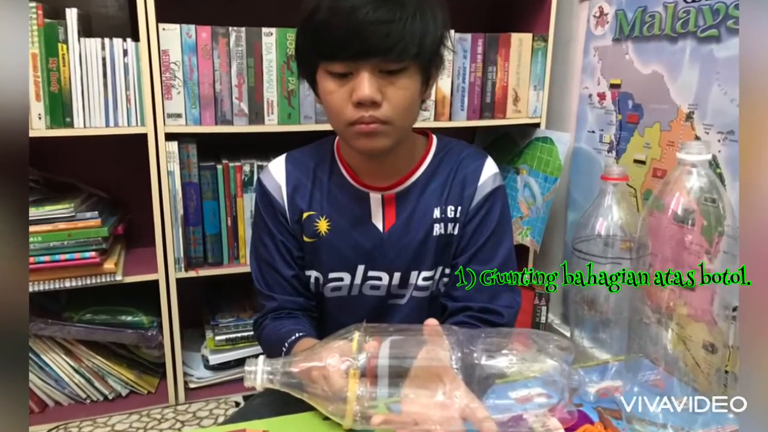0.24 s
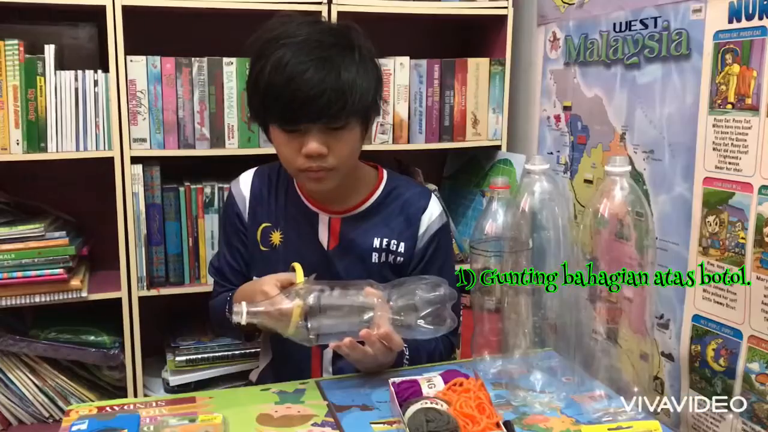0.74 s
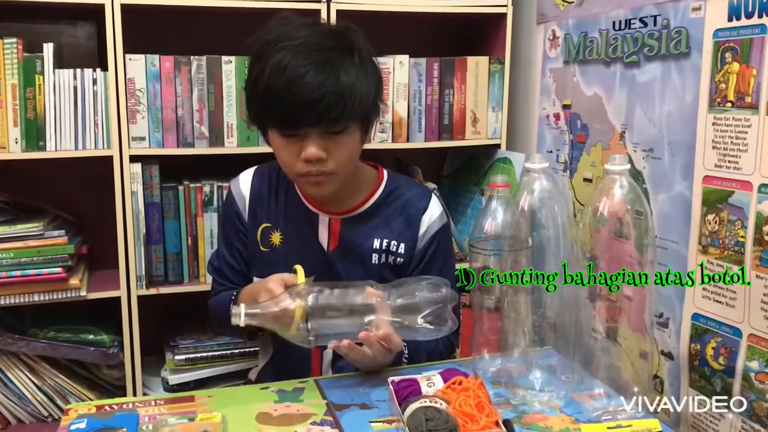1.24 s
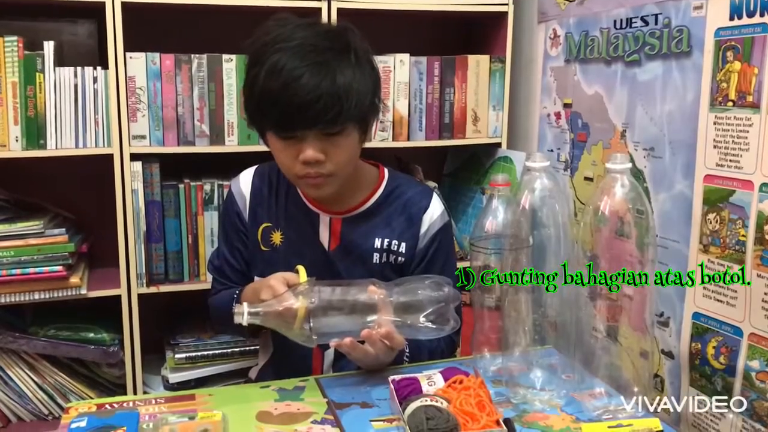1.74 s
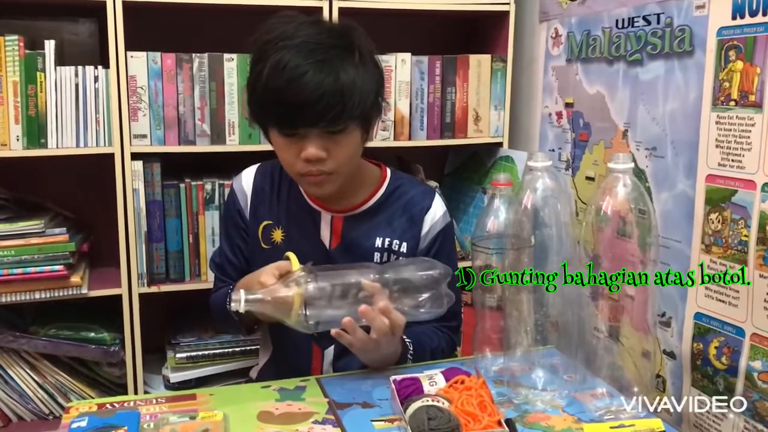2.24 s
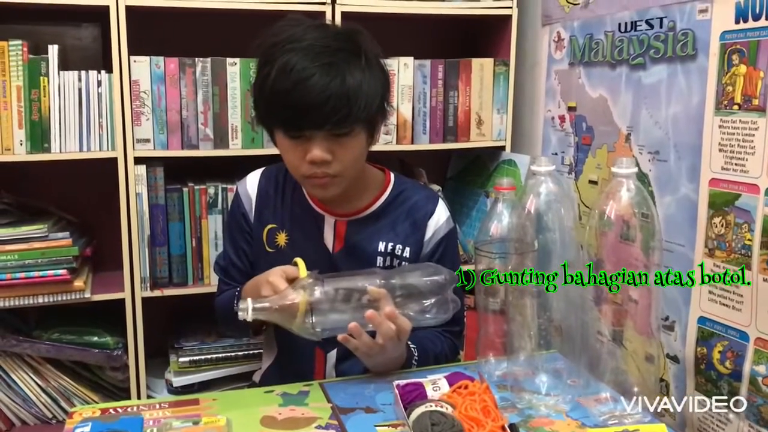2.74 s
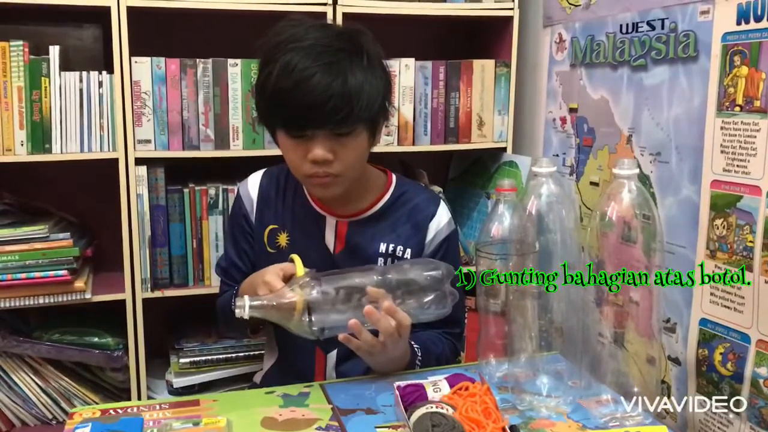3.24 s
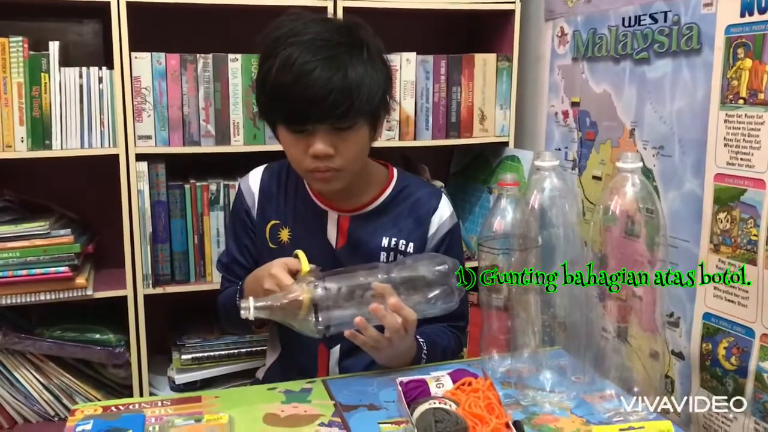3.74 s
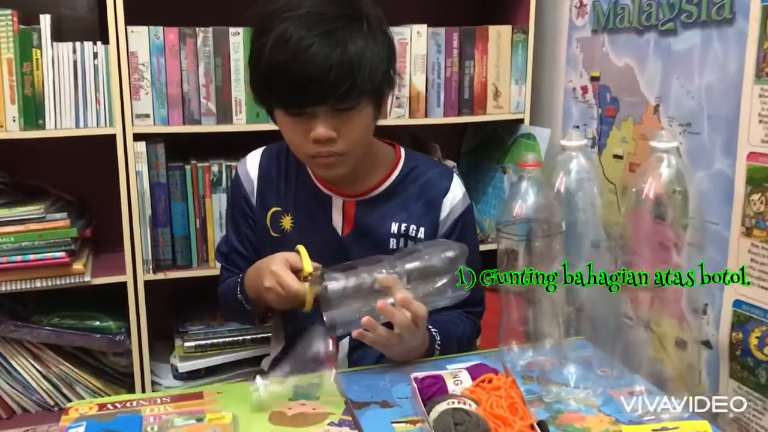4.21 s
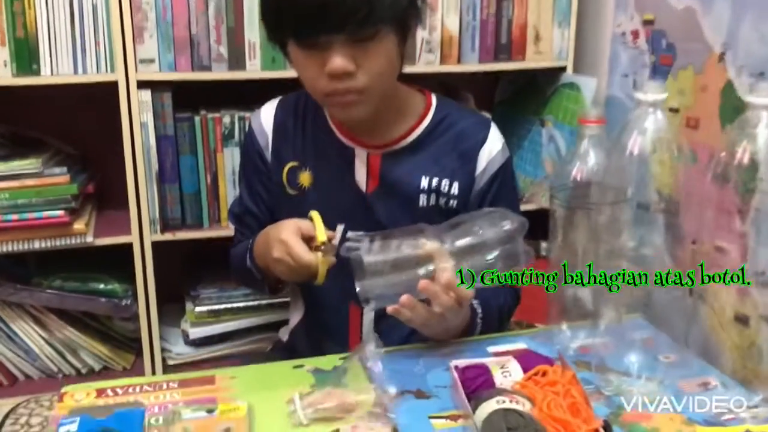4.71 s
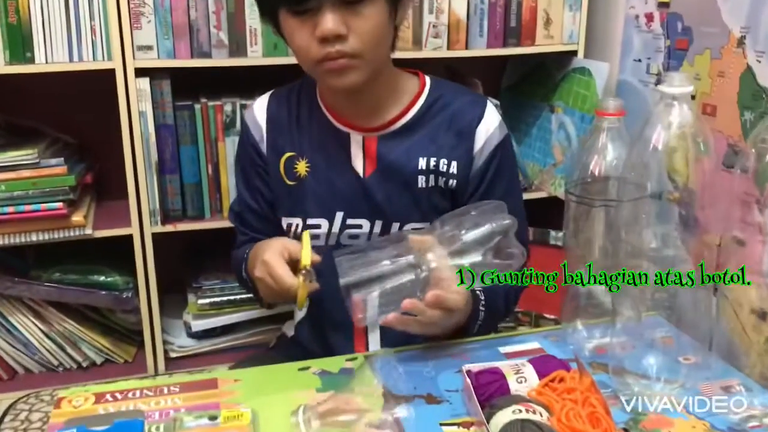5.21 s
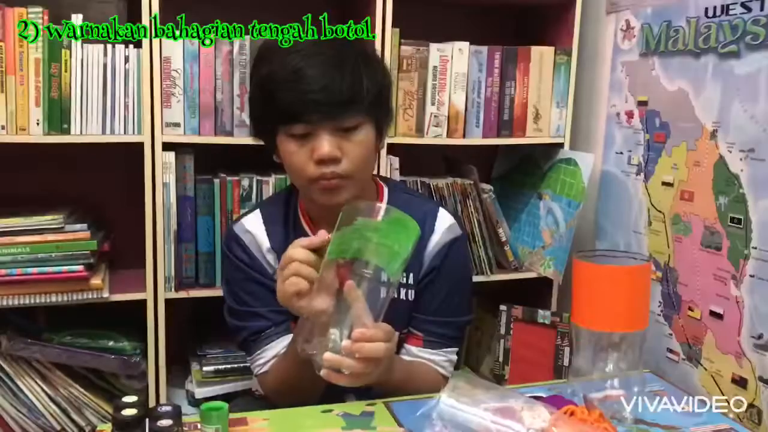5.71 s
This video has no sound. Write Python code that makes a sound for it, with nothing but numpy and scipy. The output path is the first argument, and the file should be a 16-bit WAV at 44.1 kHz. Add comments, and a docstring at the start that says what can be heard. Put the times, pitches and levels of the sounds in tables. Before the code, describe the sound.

The first 0.6 seconds are completely silent; then soft room air enters abruptly with a low hiss that fades over about a second. From 0.9 s, a thin plastic bottle crackles lightly as scissors bite in. A hollow snap comes at 1.4 s, with two more around 1.6 s, and bright crisp buckles follow near 1.8 to 1.95 s. From 2.1 to 3.7 s the cutting is quieter: short dry rasps, tiny ticks and a very faint high squeak around 2.8 s. Rasping and crackling thicken from 3.7 s, reaching a sharp, bright snap at 4.1 s. At 4.2 s the severed neck strikes the table with a loud hard plastic knock, then bounces at about 4.33, 4.4 and 4.5 s, dwindling by 4.7 s. The small room adds short reflections. Quiet air follows with barely audible ticks near 5.0 and 5.55 s; at 5.6 s a faint low mains hum and hiss switch in.

```python
"""Scissors cut the neck off a thin plastic bottle in a small furnished room. The blades rasp through the wall
in tiny slips, which ring the bottle; squeaks and thin ticks join in. The wall crackles and snaps in short
bursts of noise shaped by its modes and the air inside. After the last snap the neck drops and bounces on the
table, each knock ringing its own modes. The background is still room air filtered from noise; a hiss sets in at
the start and fades; a faint mains hum and hiss come in late."""
import sys
import numpy as np
from scipy import signal
from scipy.fft import rfft, irfft
from scipy.io import wavfile
from scipy.ndimage import uniform_filter1d

SR = 44100
rng = np.random.default_rng(int(sys.argv[2]) if len(sys.argv) > 2 else 0)


def wrap_up_sound(samples):
    """Save the sound to the file named by the first command line argument, as 16-bit audio."""
    columns = np.atleast_2d(samples).T
    # keep every value between -1 and 1, then stretch to whole-number steps
    tamed = np.clip(columns, -1, 1)
    steps = np.round(tamed * 32767).astype(np.int16)
    wavfile.write(sys.argv[1], SR, steps)


N = 262824
TIME = np.arange(N) / SR
START_S = 0.628  # silence before this

# the blades close, timed from the bite: start_s, length_s, bite_level_db,
# swell_db (until they stop), treble_db (relative to the rasp of the wall)
STROKES = [(1.073, 0.061, -59, 1.5, -13), (1.586, 0.03, -54, 13.5, -6.5), (2.168, 0.088, -58, 11, -12),
           (2.467, 0.043, -66.5, -7, -20), (2.764, 0.053, -59.5, 0, -11.5), (2.853, 0.0519, -60, 0, -8),
           (3.135, 0.17, -64, 12, -12.5), (3.59, .065, -58.5, -1.5, -9), (3.742, .1, -65, 4, -8.5),
           (3.927, 0.083, -54, -5, -10), (4.036, 0.074, -51.5, 14.5, -10)]
# low, mid, high and top ranges: low_edge_hz, high_edge_hz
RANGES = [(150, 600), (600, 2200), (2200, 7000), (7000, 17000)]


def from_db(db):
    """Decibels to amplitude gain."""
    return 10 ** (np.asarray(db) / 20)


def rms_one(x):
    """Scale to rms 1."""
    return x / np.sqrt(np.mean(x ** 2) + 1e-20)


def at_hz(points, hz):
    """Read a table of frequency and value on a log-frequency axis."""
    table_hz, value = np.transpose(points)
    return np.interp(np.log(np.maximum(hz, 1)), np.log(table_hz), value)


def band(x, low_hz, high_hz, order=2):
    """Causal band-pass."""
    sos = signal.butter(order, [low_hz, high_hz], "band", fs=SR, output="sos")
    return signal.sosfilt(sos, x + 1e-18)


def dying(t, t60):
    """Exponential envelope that falls 60 dB in t60 seconds."""
    return np.exp(-np.log(1000) * t / t60)


def coloured(x, spectrum):
    """Filter a running sound by a broad spectrum and bring it to rms 1."""
    gain = from_db(at_hz(spectrum, np.fft.rfftfreq(len(x), 1 / SR)))
    return rms_one(irfft(rfft(x) * gain, len(x)))


def resonate(x, modes):
    """A body passes the force, rings on at its modes and is weak at those with negative dB."""
    for hz, width_hz, db in modes:
        radius = np.exp(-np.pi * max(width_hz, 14) / SR)
        zeros = (1 - radius * radius) / 2 * np.array([1, 0, -1])  # unit gain at the mode
        poles = [1, -2 * radius * np.cos(2 * np.pi * hz / SR), radius * radius]
        ring = signal.lfilter(zeros, poles, x)
        x = x + (from_db(db) - 1) * ring
    return x


def add(out, x, s):
    """Mix x in at time s."""
    i = int(s * SR)
    out[i:i + len(x)] += x[:N - i]


def shifted(modes, detune, vary_db=3.5):
    """Grip and contact point change from touch to touch, and with them each mode's pitch and strength."""
    chance = rng.standard_normal((len(modes), 2))
    return [(hz * (1 + detune * a), width_hz, db + vary_db * b)
            for (hz, width_hz, db), (a, b) in zip(modes, chance)]


def bottle(s, cavity_width_hz=32, cavity_db=16):
    """Modes of the bottle at time s: the air inside and the wall around it, with a low standing wave of the
    room."""
    # resonance of the air, whose pitch changes as the cut opens: time_s, pitch_hz
    cavity = [(1.0, 364), (1.43, 334), (1.62, 347), (2.25, 361), (4.0, 359.5), (4.1, 396.5)]
    # wall, with a standing wave of the room near 90 Hz, before the variation of each touch: pitch_hz, width_hz,
    # level_db (over the broad response)
    wall_modes = [(90, 24, 11), (450, 300, 5.5), (560, 69, 4), (730, 130, -4.5), (894, 64, 7),
                  (1503, 15, 8), (1770, 24, -0.5), (2950, 1200, 4), (5370, 110, 0), (6800, 150, 3)]
    cavity_hz = np.interp(s, *np.transpose(cavity))
    return [(cavity_hz, cavity_width_hz, cavity_db)] + shifted(wall_modes, detune=.018)


def slips(t, per_s, spread_db, friction):
    """Random tiny jerks of uneven size and either sign, rms 1, over smooth friction noise."""
    sizes = from_db(spread_db * np.minimum(rng.exponential(1, len(t)), 4))
    signed = sizes * rng.choice([-1, 1], len(t))
    jerks = rms_one(signed * (rng.random(len(t)) < per_s / SR))
    return jerks + friction * rng.standard_normal(len(t))


def flattened(x, envelope):
    """Spread a crack in time under an envelope while its spectrum stays nearly even."""
    for _ in range(3):
        spectrum = rfft(x * envelope, 2 * len(x))
        x = irfft(spectrum / (np.abs(spectrum) + 1e-12))[:len(x)]
        x = x / np.sqrt(np.abs(uniform_filter1d(x ** 2, size=128)) + 1e-18)
    return x * envelope


def range_levels(balance, db, thump_db, bright_db):
    """Levels of a blow in the four ranges: a thump adds bass, a sharper contact adds treble."""
    *ranges_db, high_share = balance
    return db + np.array(ranges_db) + np.array([thump_db, 0, high_share * bright_db, bright_db])


def blows(events, balance, ring_t60s, after_db, after_t60):
    """Each blow rings its modes for a moment; smaller ticks follow as the struck part springs back."""
    out, t = np.zeros(N), TIME[:8192]
    level_samples = int(.008 * SR)  # a blow's energy is spread over 8 ms to define its level
    for s, db, thump_db, bright_db, modes in events:
        ticks = from_db(after_db) * slips(t, per_s=350, spread_db=2.0, friction=0) * dying(t, after_t60)
        levels_db = range_levels(balance, db, thump_db, bright_db)
        for (low_hz, high_hz), level_db, t60 in zip(RANGES, levels_db, ring_t60s):
            burst = flattened(rng.standard_normal(len(t)), dying(t, t60)) + ticks
            sound = band(resonate(burst, modes), low_hz, high_hz, order=3)
            level = np.sqrt(np.sum(sound ** 2) / level_samples)
            add(out, sound * from_db(level_db) / level, s)
    return out


def background():
    """Still room air, an opening hiss that fades away, and later a mains hum with more hiss."""
    # steady room air: frequency_hz, density_db (per Hz, relative)
    air_spectrum = [(18, -32.5), (30, -11), (53, 4), (179, -7.5), (266, -6), (486, -14), (702, -16),
                    (1860, -21), (3140, -21), (3580, -24), (10200, -29), (14800, -25.5), (16000, -28)]
    # opening and late hiss: frequency_hz, density_db (per Hz, relative)
    hiss_spectrum = [(76, -31.5), (130, -4), (258, -0.5), (356, -3), (394, -8), (577, -8), (1430, -9.5),
                     (8570, -30), (14500, -41), (16000, -29)]
    # mains hum: frequency_hz, level_db (rms)
    hum_tones = [(100, -62), (200, -73)]
    air_db, late_hiss_db, opening_hiss_db = -65.5, -61.5, -61
    opening_hiss_attack_s, opening_hiss_t60 = 0.011, 0.81
    hum_start_s, hum_fade_s = 5.59, 0.0031

    air = from_db(air_db) * coloured(rng.standard_normal(N), air_spectrum)
    hiss = coloured(rng.standard_normal(N), hiss_spectrum)
    age = np.maximum(TIME - START_S, 0)
    opening_envelope = np.minimum(age / opening_hiss_attack_s, 1) * dying(age, opening_hiss_t60)
    opening_hiss = from_db(opening_hiss_db) * opening_envelope * hiss
    hum = np.zeros(N)
    for hz, db in hum_tones:
        hum += np.sqrt(2) * from_db(db) * np.sin(2 * np.pi * (hz * TIME + rng.random()))
    late = np.clip((TIME - hum_start_s) / hum_fade_s, 0, 1)
    return air + opening_hiss + late * (hum + from_db(late_hiss_db) * hiss)


def panel(s, pitch_hz, width_hz, main_db):
    """Modes of the bottle at time s and of the panel that gives way."""
    # overtones of the panel, before variation: pitch_hz, width_hz, level_db (over the broad response)
    overtones = [(2020, 320, -3.5), (2990, 260, 4.5), (4160, 160, 5), (5600, 510, 3), (7200, 2500, -8.5),
                 (9190, 960, 4)]
    return bottle(s) + [(pitch_hz, width_hz, main_db)] + shifted(overtones, detune=.03)


def small_buckles():
    """While the blades close, the wall crackles at random, at a level that follows their pressure."""
    crackles_per_s = 24  # the count in each stroke is rounded down
    crackle_db, spread_db = -1.5, 1  # relative to the rasp, and up or down at random
    thump_db, bright_db, panel_hz = 3, 5.5, 940
    rows = []
    for start, length, db, swell_db, _ in STROKES:
        count = int(crackles_per_s * length)
        for k, (when, size) in enumerate(rng.uniform(0, 1, (count, 2))):
            done = (k + when) / count  # share of the stroke completed
            level_db = db + done * swell_db + crackle_db + spread_db * (2 * size - 1)
            rows.append((start + done * length, level_db, thump_db, bright_db, panel_hz))
    return rows


def crackles():
    """Panels of the wall buckle under the fingers and blades and ring briefly."""
    # single buckles: start_s, level_db (before balance), thump_db (extra bass), brightness_db, pitch_hz
    buckles = [(0.8756, -52.5, 4.5, 0.5, 929), (0.926, -55, 2, 1, 926), (0.9774, -53, 0, -4, 907),
               (1.015, -48.5, -0.5, -8.5, 910), (1.089, -52, 5, -6, 903), (1.243, -55, -9, -2, 1500),
               (1.255, -46, 3, 2, 1497), (1.8225, -45, -2, 4.5, 2920), (1.8988, -35, -14.5, 5, 921),
               (1.9534, -38.5, -6.5, 2, 953), (2.822, -59, -1.5, 7, 2100), (2.968, -51.5, 6.5, -4, 947),
               (3.431, -57.5, -22, 5, 1490), (3.586, -49.5, -5, 0, 960), (3.799, -51.5, -0.5, 2, 960),
               (3.828, -49.5, -6.5, 1, 1010), (4.029, -45, -2.5, -5, 925)]
    # offsets of the ranges: low_db, mid_db, high_db, top_db, share of brightness in the high range
    balance = (-4, 0.5, -6, -19.5, 0.94)
    events = []
    for s, db, thump_db, bright_db, hz in buckles + small_buckles():
        events.append((s, db, thump_db, bright_db, panel(s, hz, width_hz=50, main_db=9.5)))
    sound = blows(events, balance, ring_t60s=[0.029, 0.024, 0.034, 0.017], after_db=-12.5, after_t60=0.15)
    # a buckle is softer than steel and lacks the highest treble
    return signal.sosfilt(signal.butter(2, 10000, fs=SR, output="sos"), sound)


def pressing(t, length, db, swell_db, bite_s):
    """Envelope of a stroke, t counted from the bite: sink in, swell while the hand closes, release."""
    attack = np.clip(1 + t / bite_s, 0, 1) ** 2
    swell = from_db(db + swell_db * np.clip(t / length, 0, 1))
    release = dying(np.maximum(t - length, 0), t60=0.11)
    return attack * swell * release


def rasp(cavity_db, jerk_db):
    """In each stroke the blades slip through the wall in tiny steps, which ring the bottle."""
    # broad colour of the slipping force: frequency_hz, density_db (per Hz, relative)
    force_spectrum = [(70, -21), (200, -6), (400, -4), (700, 0.5), (1500, -5.5), (2200, -6), (3300, -7),
                      (4500, -12), (7000, -19), (16000, -24.5)]
    bite_s = .025  # the edge sinks in
    out, t = np.zeros(N), TIME[:SR // 2]
    for start, length, db, swell_db, treble_db in STROKES:
        effort = pressing(t - bite_s, length, db, swell_db, bite_s)
        # the blades catch and let go, so the force comes in clumps
        unevenness = rms_one(uniform_filter1d(rng.standard_normal(len(t)), size=350))
        catching = from_db(jerk_db * unevenness)
        steps = slips(t, per_s=1100, spread_db=2.5, friction=0.85)
        force = coloured(catching * steps, force_spectrum)
        ringing = resonate(force, bottle(start))
        wall = rms_one(band(ringing, RANGES[1][0], RANGES[2][1]))
        cavity = from_db(cavity_db) * rms_one(band(ringing, *RANGES[0]))
        edge = from_db(treble_db) * rms_one(band(force, *RANGES[3], order=4))
        add(out, effort * (wall + cavity + edge), start - bite_s)
    return out


def thin_ticks():
    """Thin bright ticks, most during the cutting and two after it, that ring bottle and blades."""
    # ticks: start_s, level_db (before balance)
    tick_rows = [(1.1243, -58.5), (1.757, -62), (2.999, -59), (3.7323, -53.5), (3.913, -52.5), (3.929, -47),
                 (4.086, -43.5), (4.974, -63.5), (5.558, -64.5)]
    # faint ring of the blades: pitch_hz, width_hz, level_db (over the broad response)
    blade_modes = [(1510, 20, 12)]
    # offsets of the ranges: low_db, mid_db, high_db, top_db, share of brightness in the high range
    balance = (-6.5, -4.5, -0.5, -7.5, 0)
    events = [(s, db, 0, 0, bottle(s) + blade_modes) for s, db in tick_rows]
    return blows(events, balance, ring_t60s=[0.013, 0.052, .034, 0.027], after_db=-10.5, after_t60=0.19)


def snips():
    """The blades break through: the wall gives way with a crack and the air in the bottle thumps."""
    # cracks: start_s, level_db (before balance and body), thump_db (extra bass), brightness_db
    cracks = [(1.4292, -34, 2, -8.5), (1.5826, -42.5, -6.5, -1), (1.6124, -36.5, -4.5, 2),
              (4.1026, -28.5, 4, 13)]
    # offsets of the ranges: low_db, mid_db, high_db, top_db, share of brightness in the high range
    balance = (-0.5, 0, -3, -9.5, 0.85)
    events = [(*row, bottle(row[0], cavity_width_hz=23, cavity_db=17)) for row in cracks]
    crack = blows(events, balance, ring_t60s=[0.038, .048, 0.039, 0.02], after_db=-15.5, after_t60=0.15)
    # modes common to all cracks: pitch_hz, width_hz, level_db
    body = [(441, 40, 3.5), (550, 60, 4), (696, 91, -9.5), (1017, 50, 5), (1340, 250, -2.5), (2030, 330, -2)]
    return resonate(crack, body)


def squeaks(width_hz):
    """Where steel drags on plastic, the slips crowd into a narrow, bright band."""
    # squeaks: start_s, end_s, pitch_hz, level_db (rms before the fades)
    drags = [(2.746, 2.944, 5344, -68), (3.922, 3.952, 6716, -57)]
    out = np.zeros(N)
    for start, end, hz, db in drags:
        t = TIME[:int(max(end - start, .01) * SR)]
        steps = slips(t, per_s=1400, spread_db=-0.5, friction=.3)
        drag = band(steps, hz - width_hz / 2, hz + width_hz / 2)
        add(out, from_db(db) * rms_one(drag) * signal.windows.tukey(len(t)), start)
    return out


def neck(pitch_hz, width_hz, main_db):
    """Modes of the neck as it lands; the main one depends on which part strikes the table."""
    # stiff neck and table top, with two standing waves of the room near 214 and 264 Hz, before variation:
    # pitch_hz, width_hz, level_db (over the broad response)
    other_modes = [(214, 30, 6), (264, 30, 5), (380, 54, 9.5), (655, 120, 4), (764, 98, -8), (910, 70, 4.5),
                   (1056, 86, 2), (1287, 90, 5), (1600, 100, 4), (2070, 420, -7), (3050, 150, 11.5),
                   (3590, 270, 12), (4900, 600, 9), (8000, 680, -4.5)]
    return [(pitch_hz, width_hz, main_db)] + shifted(other_modes, detune=.015)


def bounces():
    """The cut-off neck clatters to rest on the table, each knock ringing its modes."""
    # knocks: start_s, level_db (before balance), thud_db (extra bass), pitch_hz (main mode), brightness_db
    knocks = [(4.2079, -13, -6, 1390, 0.5), (4.2204, -32, 4, 2970, 19.5), (4.3349, -20, -1, 1300, -2),
              (4.4085, -32.5, -8, 2800, 13), (4.418, -24.5, 2.5, 1110, -0.5),
              (4.4897, -25.5, -1.5, 1112, 2), (4.566, -39.5, 3, 889, 9), (4.6213, -48.5, 5, 1220, 13),
              (4.6592, -45, 0.5, 1140, 6), (4.69, -46, 2, 890, 5.5)]
    # offsets of the ranges: low_db, mid_db, high_db, top_db, share of brightness in the high range
    balance = (-11, 0.5, -7, -17, 0.58)
    events = []
    for s, db, thud_db, hz, bright_db in knocks:
        events.append((s, db, thud_db, bright_db, neck(hz, width_hz=240, main_db=11)))
    return blows(events, balance, ring_t60s=[0.03, 0.013, 0.018, 0.018], after_db=-20.5, after_t60=0.07)


def room(x, build_s):
    """Dull first reflections and a diffuse tail join the direct sound; standing waves colour it all."""
    # reverberation time: frequency_hz, t60_s
    decay_times = [(90, 0.43), (200, .34), (400, 0.58), (650, 0.55), (1200, 0.24), (4000, 0.29),
                   (8000, 0.17), (16000, 0.28)]
    # tail against the direct sound, before standing waves: frequency_hz, level_db
    tail_levels = [(90, -4), (200, -2), (400, 0.5), (800, -8), (1400, 0), (4000, -8.5), (8000, -2),
                   (16000, -11.5)]
    # first reflections off table, shelves and walls: delay_s, level_db
    echoes = [(.0029, -8), (0.0112, -14.5), (0.0212, -16.5), (.0295, -20.5), (.034, -15.5)]
    # standing waves in the bass: pitch_hz, width_hz, level_db
    standing_waves = [(93, 14, 11), (213, 23, 5.5), (246, 23, -6.5)]
    t, response = TIME[:SR // 2], np.zeros(SR // 2)
    edges_hz = np.geomspace(70, 18000, 14)
    for low_hz, high_hz in zip(edges_hz, edges_hz[1:]):
        hz = np.sqrt(low_hz * high_hz)
        envelope = dying(t, at_hz(decay_times, hz)) * (1 - np.exp(-(t / build_s) ** 2))
        tail = band(rng.standard_normal(len(t)), low_hz, high_hz) * envelope
        # at 0 dB the tail has the energy of the direct impulse in this band
        level = np.sqrt(2 * (high_hz - low_hz) / SR / np.sum(tail ** 2))
        response += tail * from_db(at_hz(tail_levels, hz)) * level
    response[0] += 1  # direct sound
    for s, db in echoes:
        add(response, from_db(db) * np.array([1, 2, 1]) / 4, s)
    return signal.fftconvolve(x, resonate(response, standing_waves))[:N]


def scene():
    """Cutting, crackling and the falling neck, all heard in the room over its background."""
    blades = rasp(cavity_db=1.5, jerk_db=2.8) + squeaks(width_hz=560) + thin_ticks()
    close_sound = blades + snips() + bounces() + crackles()
    return (room(close_sound, build_s=0.0033) + background())[None]


def record(dry):
    """Silent until switched on; the microphone drops the deep bass, peaks clip and the top is cut."""
    thinned = signal.sosfilt(signal.butter(2, 35, "high", fs=SR, output="sos"), dry)
    live = np.clip(thinned, -1, 1) * (TIME >= START_S)
    top_cut = signal.ellip(10, .2, 80, 16000, fs=SR, output="sos")  # steep low-pass at 16 kHz
    return signal.sosfilt(top_cut, live)


dry = scene()
out = record(dry)
wrap_up_sound(out)
```